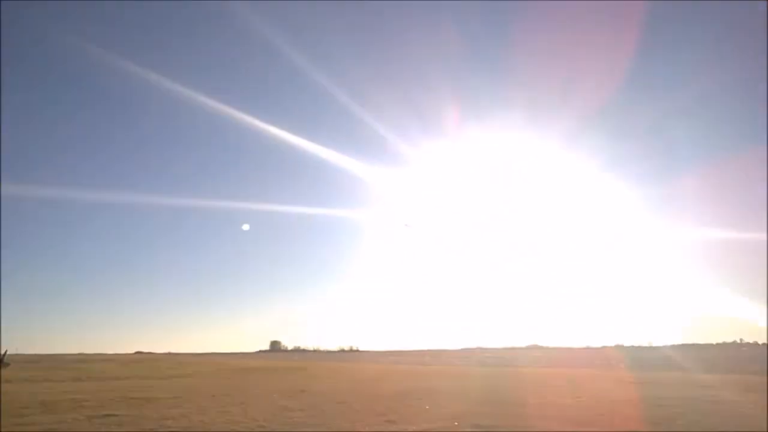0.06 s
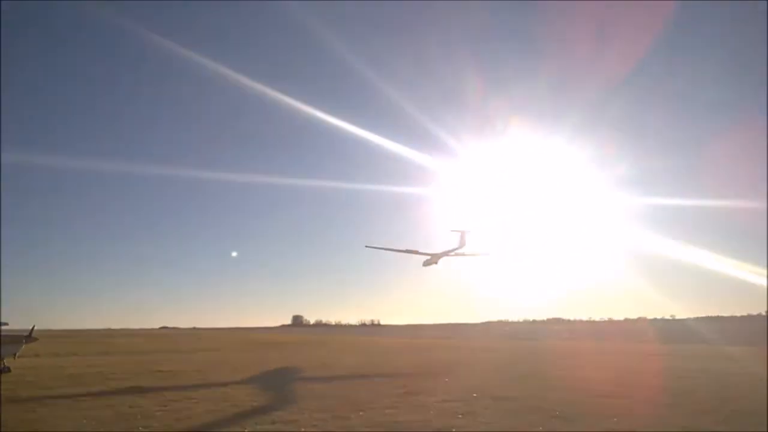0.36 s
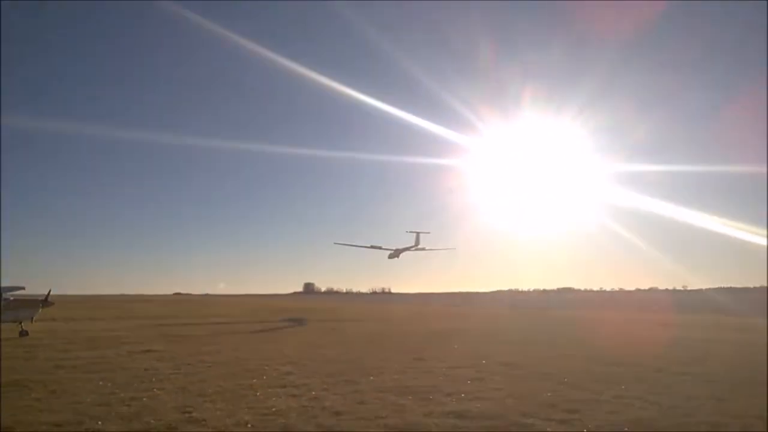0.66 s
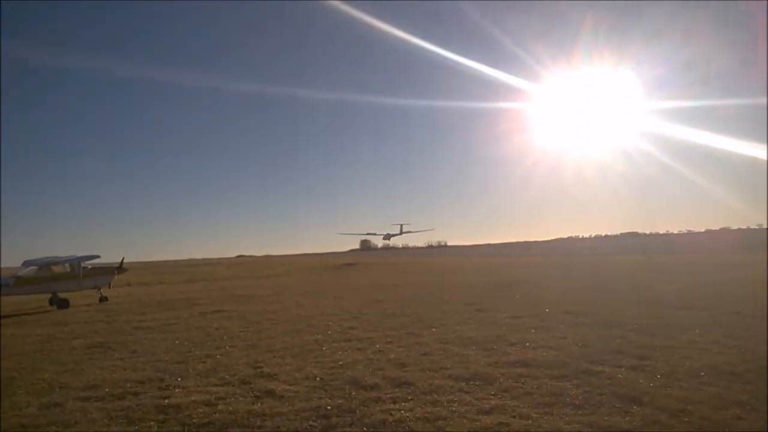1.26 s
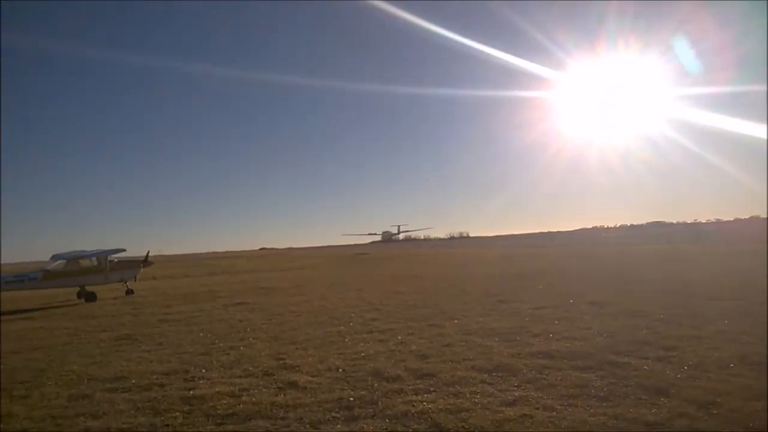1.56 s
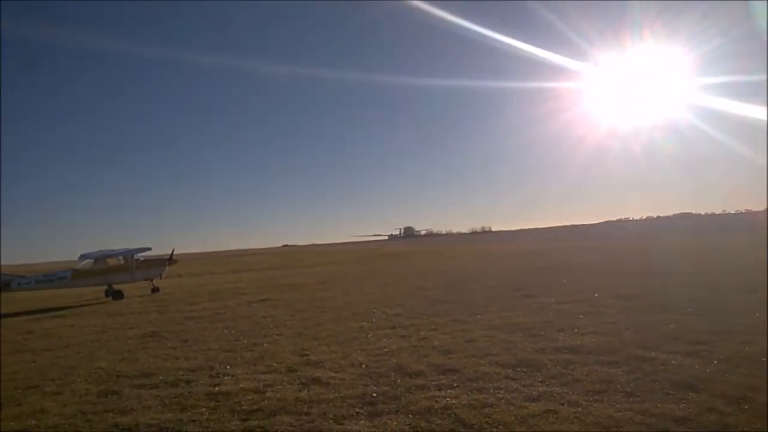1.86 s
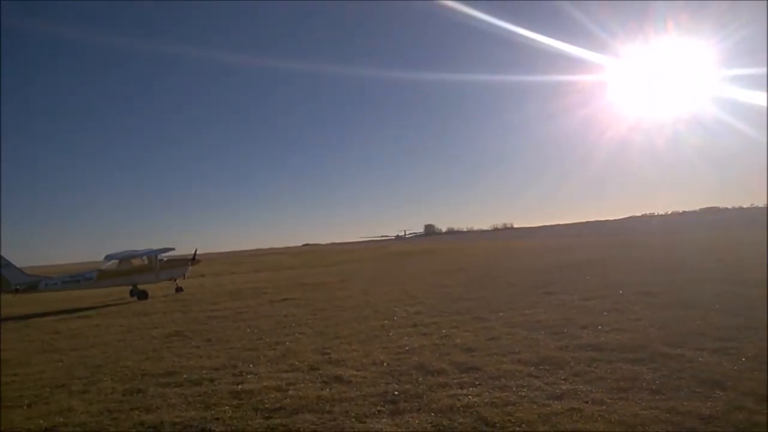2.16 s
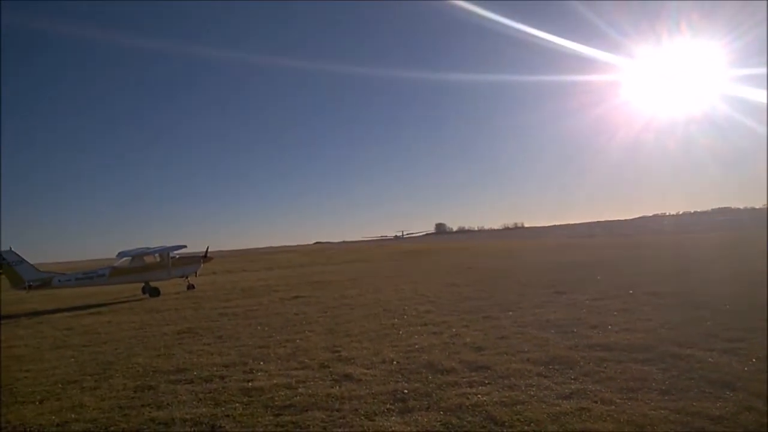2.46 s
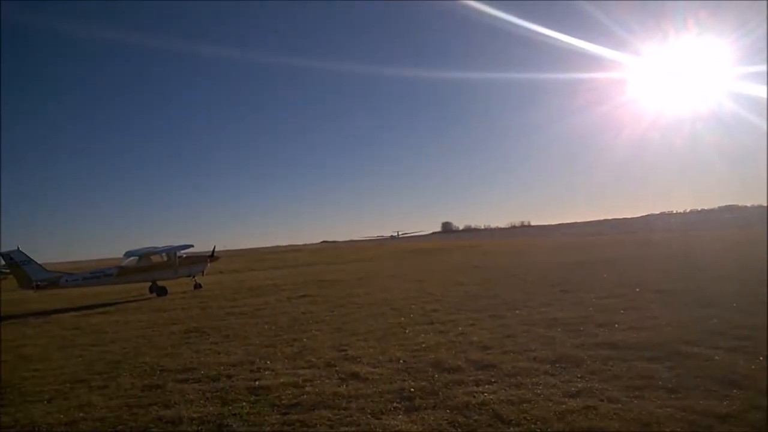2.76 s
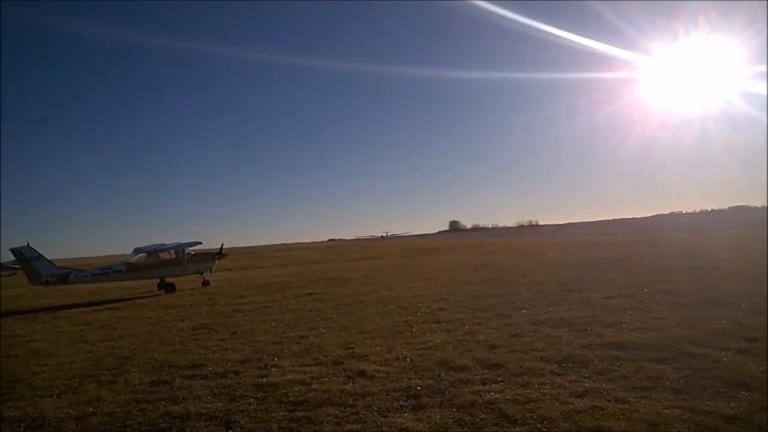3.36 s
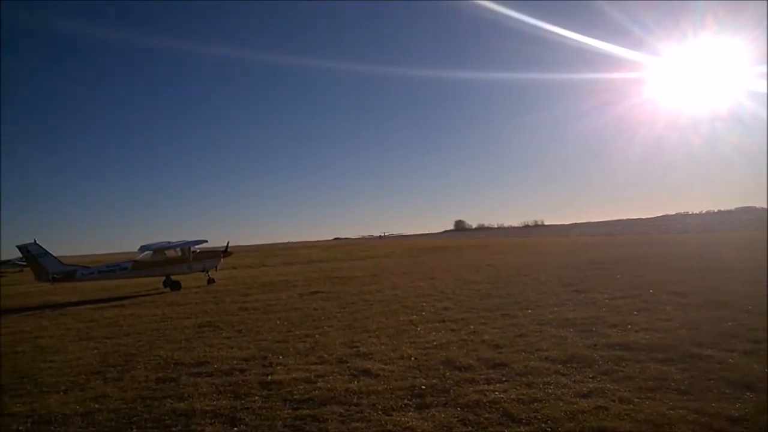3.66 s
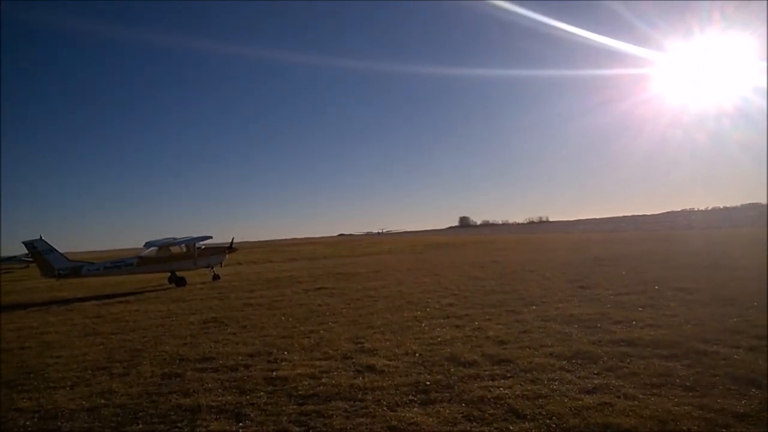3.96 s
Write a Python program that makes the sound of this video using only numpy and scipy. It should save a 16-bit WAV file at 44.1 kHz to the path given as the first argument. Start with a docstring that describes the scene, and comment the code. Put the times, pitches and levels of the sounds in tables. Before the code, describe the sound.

A glider passes low over a grass airfield with an airy rush and a breathy whistle. The sound grows duller as it moves away, while wind rumbles and thumps on the microphone throughout.

```python
"""Wind rumbles and thumps on the microphone as the rush of a glider swells, low over a grass airfield.
Air tumbles over the wings and whistles at a gap; the whistle sinks and a hollow tone rises behind it.
The echo from the ground mixes with the rush to make a rising sweep, and distance dulls the rush as
the glider leaves. Now and then the sound turns dull and buzzy for an instant."""
import sys
import numpy as np
from scipy import signal
from scipy.io import wavfile
from scipy.ndimage import uniform_filter1d, map_coordinates

SR = 44100
rng = np.random.default_rng(int(sys.argv[2]) if len(sys.argv) > 2 else 0)


def pcm_store(signal):
    """Save signal as 16-bit PCM."""
    levels = np.round(np.clip(np.atleast_2d(signal), -1, 1) * 32767)
    wavfile.write(sys.argv[1], SR, levels.astype(np.int16).T)


N = 176400
T = np.arange(N) / SR


def from_db(db):
    """Turn decibels into a number to multiply by."""
    return 10 ** (np.asarray(db) / 20)


def rms_one(x):
    """Scale a sound so that its average strength (rms) is 1."""
    return x / np.sqrt(np.mean(x ** 2) + 1e-20)


def in_time(rows):
    """Join a table's rows with straight lines: one curve for each column after the time."""
    times, *columns = np.transpose(rows)
    return [np.interp(T, times, column) for column in columns]


def low_pass(x, hz, order):
    """Keep what lies below hz; a higher order cuts more sharply."""
    return signal.sosfilt(signal.butter(order, hz, fs=SR, output="sos"), x)


def drift(rate):
    """A smooth random wobble about 1 in size; a higher rate wobbles faster."""
    step = 40   # samples between the points of the wobble
    pole = np.exp(-2 * np.pi * step * rate / SR)
    slow = signal.lfilter([1], [1, -2 * pole, pole ** 2], rng.standard_normal(N // step + 2002))[2000:]
    return np.interp(np.arange(N) / step, np.arange(len(slow)), rms_one(slow))


def coloured_noise(spectrum, change_db=lambda hz: 0):
    """Noise of strength 1 with a given tone colour; change_db then turns each band up or down."""
    pitches, levels = np.transpose(spectrum)
    edges = 18 * 2 ** (np.arange(31) / 3)   # three bands to an octave
    white = rng.standard_normal((2, N + SR // 2))
    out, power = 0, 0
    for k, (low, high) in enumerate(zip(edges, edges[1:])):
        if high > pitches[0] and low < pitches[-1]:
            hz = np.sqrt(low * high)
            band_pass = signal.butter(3, [low, high], btype="band", fs=SR, output="sos")
            band = rms_one(signal.sosfilt(band_pass, white[k % 2])[-N:])
            gain = from_db(np.interp(np.log(hz), np.log(pitches), levels)) * np.sqrt(high - low)
            out = out + gain * from_db(change_db(hz)) * band
            power += gain ** 2
    return out / np.sqrt(power)


def narrow_noise(hz, width_hz):
    """Noise around a sliding pitch: the narrower it is, the more it sounds like a note."""
    phase = 2 * np.pi * np.cumsum(hz) / SR
    a, b = low_pass(rng.standard_normal((2, N + SR // 2)), width_hz / 2, order=2)[:, -N:]
    return rms_one(a * np.cos(phase) + b * np.sin(phase))


def evened(x, samples):
    """Hold the strength near 1 over every stretch of this many samples."""
    power = uniform_filter1d(np.abs(signal.hilbert(x)) ** 2, samples) / 2
    return x / np.sqrt(power + 1e-9)


# tone colour of the far hush (frequency [Hz], relative level [dB])
FIELD_COLOUR = [(200, -9), (1000, 1.5), (3000, -6.5), (4500, -18.5), (6500, -33), (10000, -35.5),
                (15500, -36.5)]


def field():
    """The faint, steady hush of the open field."""
    return from_db(-55.5) * coloured_noise(FIELD_COLOUR)


# loudness of the breeze (time [s], level [dB])
BREEZE_LEVEL = [(0, -34), (.5, -33.5), (.62, -39.5), (.72, -34.5), (1.05, -35.5), (1.35, -38), (1.7, -39),
                (1.9, -37.5), (2.6, -37.5), (3.5, -37), (4.0, -37)]
# its tone colour (frequency [Hz], relative level [dB])
BREEZE_COLOUR = [(22, 1), (46, 2), (62, -5.5), (80, -4), (110, -14), (145, -11), (200, -17.5), (300, -25.5),
                 (500, -33), (1000, -34.5)]


def breeze(surge_db=1.5, flutter_db=2):
    """Air blowing on the microphone makes a lumpy rumble."""
    level_db = in_time(BREEZE_LEVEL)[0] + surge_db * drift(rate=11)
    return from_db(level_db) * coloured_noise(BREEZE_COLOUR, lambda hz: flutter_db * drift(rate=9.2))


# the gusts (time [s], thump level [dB], flapping level [dB], time to swell or fade [s])
GUSTS = [(0.028, -32.5, -36, 0.011), (0.081, -25.5, -58, 0.027), (0.157, -26, -27, 0.026),
         (0.202, -21, -31, 0.018), (0.281, -25.5, -58, 0.039), (0.371, -23.5, -29.5, 0.0084),
         (0.435, -23.5, -29, 0.029), (0.528, -23.5, -43, 0.02), (0.572, -28, -34, .014),
         (0.788, -20, -34, 0.019), (0.882, -29, -40.5, 0.063), (1.169, -21, -27.5, 0.031),
         (1.251, -26.5, -57, 0.021), (1.466, -24, -26, 0.017), (1.548, -26, -49, 0.02),
         (1.87, -30.5, -50, .035), (2.105, -28, -60, 0.019), (2.225, -17, -27, 0.015),
         (2.253, -21, -50, 0.027), (2.334, -28.5, -50, 0.018), (2.509, -28, -36, 0.028),
         (2.779, -27.5, -48, .017), (3.045, -26.5, -57, .028), (3.29, -30, -50, 0.015),
         (3.368, -34, -43, 0.023), (3.877, -31, -51, 0.026), (3.979, -32, -54, .025)]
# tone colours of the thump and of the flapping (frequency [Hz], relative level [dB])
THUMP_COLOUR = [(22, -2.5), (44, 6), (74, -1), (92, -7), (120, -20), (170, -25.5), (280, -42.5), (600, -80)]
FLAP_COLOUR = [(65, 4.5), (88, 4), (120, 10), (160, -2.5), (260, -14), (450, -29.5), (900, -37)]


def gusts():
    """Each gust hits the microphone with a deep thump and some higher flapping."""
    times, thump_db, flap_db, widths = np.transpose(GUSTS)
    swells = [np.exp(-((T - time) / width) ** 2) for time, width in zip(times, widths)]
    out = 0
    for colour, levels in ((THUMP_COLOUR, thump_db), (FLAP_COLOUR, flap_db)):
        force = sum(from_db(db) * swell for db, swell in zip(levels, swells))
        out = out + force * evened(coloured_noise(colour), samples=700)
    return out


# moments when the high sounds drop away (time [s], length [s])
DIPS = [(.141, 0.0064), (0.182, 0.023), (0.331, 0.0058), (0.41, 0.0063), (0.568, 0.007), (0.599, 0.0053),
        (0.739, 0.017), (0.801, 0.012), (0.834, 0.0098), (.862, 0.013), (1.249, 0.0068), (1.657, 0.01),
        (2.088, 0.0078), (2.264, 0.014), (2.484, 0.0059), (2.975, 0.0084), (3.09, .019), (3.172, .008),
        (3.274, 0.022), (3.48, 0.0066), (3.819, 0.012)]


def treble_dips(x, above_hz=3880, dip_db=-23, buzz_hz=350.04, buzz_db=-0.5, feedback=0.54):
    """For a few milliseconds at a time the sound turns dull and buzzy."""
    def gate(extra_s):
        """Near 1 during a dip, 0 between dips."""
        pulses = (np.exp(-np.square(2 * (T - time) / (length + extra_s)) ** 2 / 2)
                  for time, length in DIPS)
        return np.minimum(sum(pulses), 1)
    dipping, buzzing = gate(extra_s=0), gate(extra_s=.016)
    echo_loop = np.r_[1, np.zeros(int(SR / buzz_hz)), -feedback]   # very fast repeats make a buzz
    buzz = signal.lfilter([np.sqrt(1 - feedback ** 2)], echo_loop, x)
    x = (1 - buzzing) * x + buzzing * from_db(buzz_db) * buzz
    dull = signal.sosfiltfilt(signal.butter(6, above_hz, fs=SR, output="sos"), x)
    return dull + from_db(dip_db * dipping) * (x - dull)


# the ground echo (time [s], delay after the direct sound [ms], strength [0-1])
GROUND_ECHO = [(0, 3.02, 0.64), (.35, 2.23, 0.9), (.6, 1.79, 0.62), (.8, 1.54, 0.66), (1.0, 1.25, 0.75),
               (1.2, 1.05, 0.78), (1.42, 0.95, 0.6), (1.75, 0.73, 0.49), (2.1, 0.735, 0.44),
               (2.7, 0.74, 0.34), (3.25, 0.73, 0.32), (3.9, .93, 0.5)]


def with_ground_echo(x):
    """A duller echo cancels some pitches; they rise as the angle flattens and the delay shrinks."""
    delay_ms, strength = in_time(GROUND_ECHO)
    read_at = np.arange(N) - delay_ms * SR / 1000
    echo = map_coordinates(low_pass(x, hz=3500, order=1), [read_at], order=3, mode="mirror")
    return x + strength * echo


# loudness of the wings' fine hiss (time [s], level [dB])
HISS_LEVEL = [(0, -70), (.11, -68), (.26, -75), (.46, -63.5), (.62, -90), (1.0, -87), (1.6, -81),
              (2.3, -83)]
# its tone colour (frequency [Hz], relative level [dB])
HISS_COLOUR = [(5000, -18), (6500, 2.5), (9500, -3), (12000, -13), (15500, -19)]


def hiss():
    """The tiniest swirls of air on the wings hiss too high to carry far."""
    return from_db(in_time(HISS_LEVEL)[0]) * coloured_noise(HISS_COLOUR)


# a late, broad swish (time [s], middle pitch [Hz], level [dB])
SWISH = [(2.4, 2500, -68), (2.85, 2300, -49), (3.1, 1903, -53), (3.33, 1750, -48), (3.46, 1850, -81)]


def swish():
    """The far-off rush swells once more, sinks in pitch and breaks off."""
    hz, db = in_time(SWISH)
    return from_db(db) * narrow_noise(hz, width_hz=860)


# loudness of the churned air behind the wings (time [s], level [dB])
WAKE_LEVEL = [(0, -52), (.4, -52.5), (.8, -48.5), (1.0, -65.5), (1.6, -53.5), (2.2, -88)]
# its tone colour (frequency [Hz], relative level [dB])
WAKE_COLOUR = [(220, -12), (370, 10.5), (500, -8.5), (700, 5.5), (930, -10), (1500, -3), (2200, -21)]


def wake(flutter_db=3.0):
    """Air behind the wings makes a low, fluttering roar, heard only close by."""
    roar = coloured_noise(WAKE_COLOUR, lambda hz: flutter_db * drift(rate=28))
    return from_db(in_time(WAKE_LEVEL)[0]) * roar


# the whistle at the gap, and a lower, hollow tone heard from behind the glider
# (time [s], pitch [Hz], level [dB], share of clear tone [0-1])
GAP_WHISTLE = [(0, 2450, -43.5, 0), (.27, 2439, -42, 0.02), (.48, 2350, -48, .3), (.62, 2335, -38.5, 0.64),
               (.72, 2330, -44.5, 0), (.77, 2115, -47, .7), (.84, 2105, -41.5, 0.64),
               (.97, 2135, -44.5, 0.66), (1.17, 2090, -49, 0.5), (1.45, 2167, -41.5, 0.3),
               (1.65, 2107, -45.5, 0.2), (1.92, 2065, -48.5, 0.35), (2.15, 2055, -49.5, 0.1),
               (2.42, 2084, -64, 0.1), (3.72, 2045, -74, 0), (3.97, 2040, -51, 0.09)]
HOLLOW_TONE = [(1.2, 896, -58, 0.2), (1.6, 1030, -50.5, 0), (1.8, 1077, -44.5, 0.17),
               (2.12, 1110, -47.5, 0.07), (2.3, 1191, -51.5, 0), (2.52, 1349, -49.5, 0),
               (2.75, 1374, -55.5, 0.3), (3.08, 1421, -48.5, 0.03), (3.33, 1438, -54, .2),
               (3.5, 1408, -54, 0.4), (4.0, 1391, -65.5, 0)]


def whistle(curve, breath_width_hz, clear_width_hz):
    """Flowing air rings at a sliding pitch, now breathy and now clear."""
    hz, db, share = in_time(curve)
    clear = evened(narrow_noise(hz, clear_width_hz), samples=2600)
    breath = narrow_noise(hz, breath_width_hz)
    return from_db(db) * (np.sqrt(share) * clear + np.sqrt(1 - share) * breath)


# loudness of the rush before the losses and the echo (time [s], level [dB])
RUSH_LEVEL = [(0, -52.5), (.33, -44.5), (.41, -43), (.5, -41), (.6, -39), (.85, -43.5), (1.1, -41.5),
              (1.45, -42), (1.75, -44), (2.1, -41.5), (2.4, -46.5), (2.7, -44), (3.33, -44), (3.45, -47),
              (3.7, -52), (4.0, -45.5)]
# its tone colour close by (frequency [Hz], relative level [dB])
RUSH_COLOUR = [(200, -9), (400, -9), (600, 0.5), (800, -4.5), (1100, -3.5), (1700, 0.5), (2200, 2.5),
               (3000, 0.5), (3600, 2.8), (4200, -6), (5200, -11.5), (6300, -23.5), (9500, -27.5),
               (12000, -43.5), (15500, -43)]
# treble lost in the air, where below zero means brighter (time [s], loss [dB per kHz])
AIR_LOSS = [(0, -2.34), (.5, 1.04), (1.0, 1.07), (1.4, 1.5), (1.8, 2.5), (2.5, 4), (3.2, 6.5), (3.6, 5),
            (4.0, 4)]
AIR_FROM_HZ, AIR_FULL_HZ = 1760, 5770
GRASS_BELOW_HZ, GRASS_LOSS_DB_PER_S = 656, 1.5


def rush(flutter_db=1.7, overhead_flutter_db=1.5, overhead_s=1.0):
    """Air tumbles over the wings. With distance, the air soaks up the highs and the grass the lows."""
    loss_per_khz, = in_time(AIR_LOSS)

    def change_db(hz):
        """The flutter of one band, minus what it loses on the way."""
        air = loss_per_khz * (np.clip(hz, AIR_FROM_HZ, AIR_FULL_HZ) - AIR_FROM_HZ) / 1000
        grass = GRASS_LOSS_DB_PER_S * T * np.clip(np.log2(GRASS_BELOW_HZ / hz), 0, 1)
        overhead = overhead_flutter_db * np.exp(-(T / overhead_s) ** 2) * drift(rate=11)
        return flutter_db * drift(rate=8.9) + overhead - air - grass
    return from_db(in_time(RUSH_LEVEL)[0]) * coloured_noise(RUSH_COLOUR, change_db)


def scene():
    """Mix the glider, the quiet field and the wind into one channel."""
    tones = whistle(GAP_WHISTLE, breath_width_hz=286, clear_width_hz=40)
    tones += whistle(HOLLOW_TONE, breath_width_hz=390, clear_width_hz=74)
    glider = with_ground_echo(rush() + wake()) + hiss() + swish() + tones
    return (treble_dips(glider + field()) + breeze() + gusts())[None]


def record(dry):
    """Fade both ends quickly and cut the very highest sounds."""
    fade_s, cutoff_hz = .004, 15750
    to_nearest_end_s = np.minimum(T, T[::-1])
    fade = np.sin(np.pi / 2 * np.minimum(to_nearest_end_s / fade_s, 1))
    return signal.sosfilt(signal.ellip(10, .1, 80, cutoff_hz, fs=SR, output="sos"), dry * fade)


dry = scene()
out = record(dry)
pcm_store(out)
```